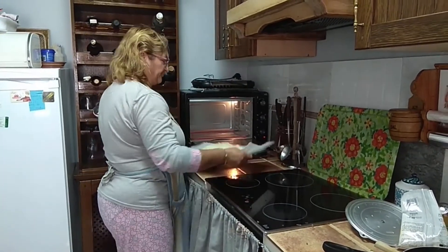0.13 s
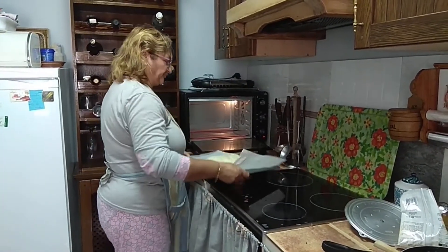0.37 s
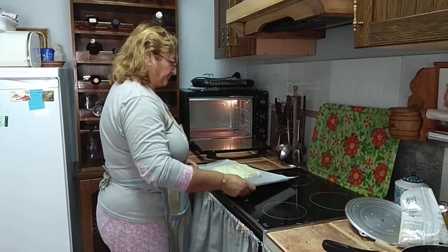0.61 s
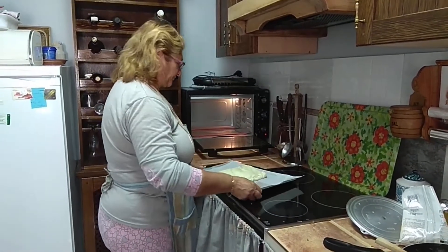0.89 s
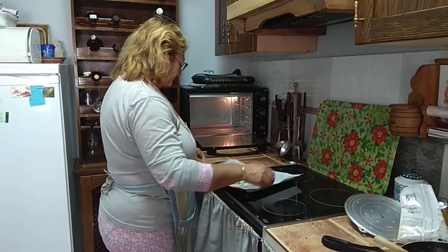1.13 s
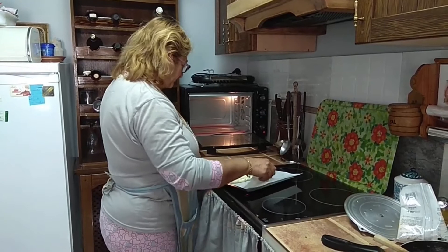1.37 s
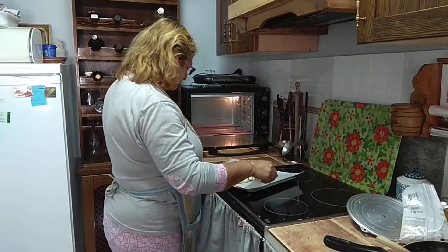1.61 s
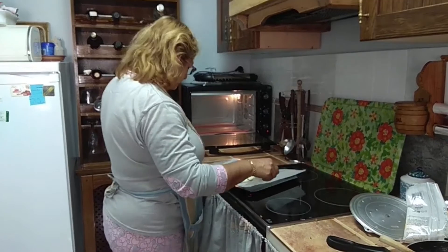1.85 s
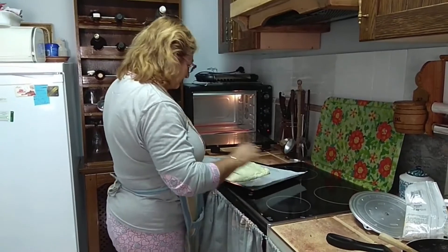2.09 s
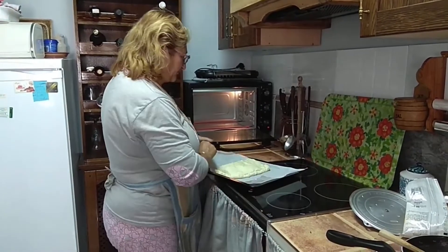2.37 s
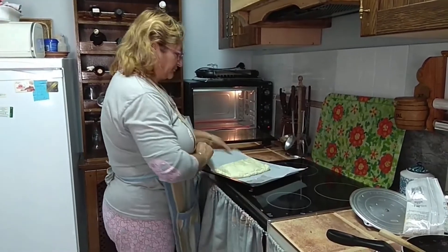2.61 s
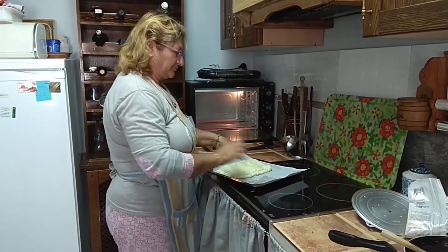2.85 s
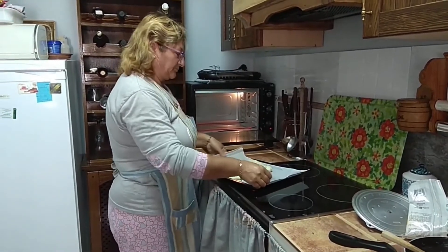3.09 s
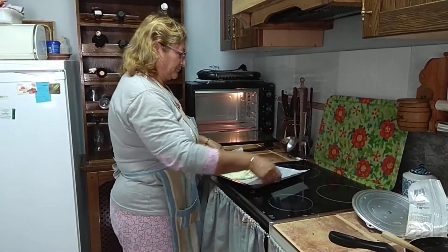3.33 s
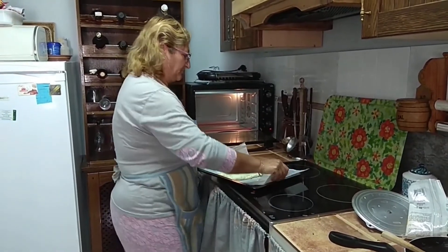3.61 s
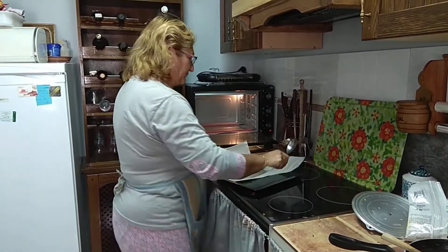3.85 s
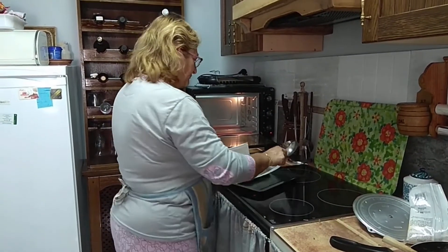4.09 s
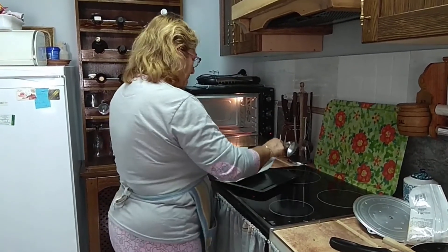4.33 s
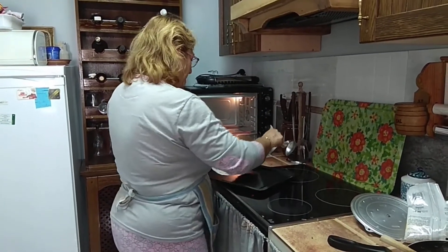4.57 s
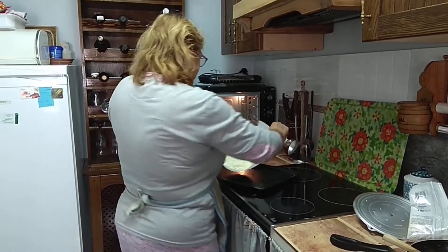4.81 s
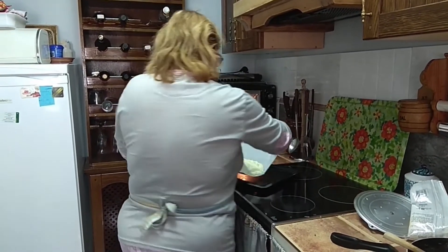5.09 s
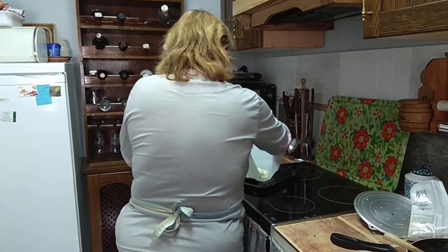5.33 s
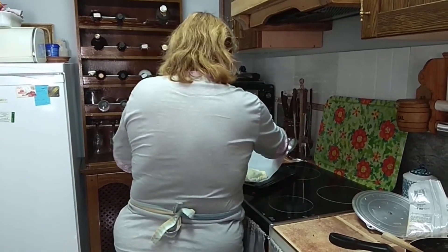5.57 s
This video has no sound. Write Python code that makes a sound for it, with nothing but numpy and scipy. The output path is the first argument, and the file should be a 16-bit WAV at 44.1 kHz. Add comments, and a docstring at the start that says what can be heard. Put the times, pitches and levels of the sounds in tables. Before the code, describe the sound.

A small, hard-walled kitchen, heard in stereo from a few metres away, with a steady faint hiss, a barely audible hum and a low rumble of movement. Paper rustles lightly at 0 to 0.4 s. At 0.54 s a thin metal baking tray lands on a glass stovetop: a hard clack, several chattering contacts within a tenth of a second, a hollow metallic ring dying within about half a second, and a smaller knock with a thud at 0.9 s. From 1.2 s baking paper crinkles in short, uneven bursts, fuller near 1.5 s, with soft bumps. A faint thin whine passes around 2.2 s. Creasing strengthens after 3 s, with sharp snaps at 3.2, 3.6 and 3.8 s and a dense crackle around 4.05 s, as rumble swells. Afterwards the paper quiets to small rustles, a crisp snap at 5.0 s, and a slight final rustle near 5.5 s.

```python
"""Paper rustles faintly over a low rumble of movement, a steady hiss and a faint hum in a small hard-walled kitchen.
After half a second a thin metal baking tray is set down on a glass stovetop: filtered clicks knock and chatter,
decaying sines ring and thud. Then hands fold baking paper: dense random clicks rustle, single impulses snap,
and a thin sine whine passes briefly. The loudest snaps come from three to four seconds in, the rumble swells again
near four and dies away. Two microphone ports stand a few metres off: cracks and paper come mostly as room echo."""
import sys
import numpy as np
from scipy import signal
from scipy.fft import rfft, irfft, next_fast_len
from scipy.io import wavfile
from scipy.ndimage import uniform_filter1d

SR = 44100
rng = np.random.default_rng(int(sys.argv[2]) if len(sys.argv) > 2 else 0)


def dump(signal):
    """Clip the signal to [-1, 1] and save it as 16-bit WAV at the path in sys.argv[1]."""
    limited = np.clip(np.atleast_2d(signal).T, -1, 1)
    pcm = np.round(limited * 32767).astype(np.int16)
    wavfile.write(sys.argv[1], SR, pcm)


def ratio_of_db(decibels):
    """Turn decibels (scalar or array-like) into linear amplitude factors; 0 dB maps to 1."""
    return 10 ** (np.asarray(decibels, float) / 20)


N = 250973
TIME = np.arange(N) / SR  # [s]

# All table levels are relative: layer gains and the port colouring follow.
# In colour tables only the shape counts, as colour() evens out the overall gain.

# Tray contacts: (time [s], blow [dB], deep ring [dB re blow], bright crack [dB re blow],
# stovetop thud [dB re blow])
TRAY_CONTACTS = [(0.542, 0.5, -19, -12.5, -36.5), (0.544, -14.5, -12.5, 3.5, -30.5),
                 (0.561, -7, -23, -3, -27), (0.579, -8.5, -25, -41, -33.5), (0.619, -20, -16, -11.5, -43),
                 (0.634, -27.5, -19, -15, -18.5), (0.783, -23, -16.5, 1.5, -7.5),
                 (0.906, -24, -11.5, 5.5, 4), (0.935, -9.5, -13, 0.5, -15.5), (0.942, -19.5, -8.5, 0, -23),
                 (1.287, -41, -13, 17.5, -33), (1.773, -26.5, -37, -4.5, -46), (4.808, -53.5, 4.5, -5, -27)]
# Colour of the dull contact crack: (frequency [Hz], level [dB per Hz])
BLOW_COLOUR = [(100, -31), (400, 2.5), (1000, 0.5), (2200, 5), (4000, -2), (6000, -7), (9000, -41),
               (14000, -59)]
# Colour of bright cracks, and of small paper creases too: (frequency [Hz], level [dB per Hz])
CRINKLE_COLOUR = [(2500, -61), (5000, -14), (7000, -16), (7800, -16.5), (8800, -10.5), (10500, -2.5),
                  (12200, -10), (13800, -20), (16000, -32)]
# Deep tray modes: (frequency [Hz], level [dB], time to fall 60 dB [s])
DEEP_MODES = [(194, -12.5, 1), (214, -14, 0.62), (230, 0.5, 0.47), (280, 7.5, 0.057), (292, -5.5, 0.41),
              (335.4, 1, 0.31), (333, -14.5, 0.95), (418.5, -4.5, 0.43), (460, -27.5, 1)]
# Upper modes of the tray's sheet, which the paper brushes too:
# (frequency [Hz], level [dB], time to fall 60 dB [s])
SHEET_MODES = [(587, -7, .4), (640, -5, .35), (792, -8, .4), (912, -7, .38), (1000, -7, .3), (1056, -9, .3),
               (1179, -10, .28), (1335, -6, .3), (1690, -5, .28), (1822, -6, .28), (1954, -9, .35),
               (2075, -1, .24), (2256, -7, .28), (2343, -4, .28), (2568, -9, .3), (2800, -11, .3)]
# Stovetop modes: (frequency [Hz], level [dB], time to fall 60 dB [s])
STOVE_MODES = [(116, -20, 0.33), (154.7, -0.5, 0.22), (178.2, -8.5, 0.057)]


def tray():
    """The contact cracks into the room while the sheet rings on and the stovetop thuds."""
    s, blow_db, deep_db, bright_db, thud_db = np.transpose(TRAY_CONTACTS)
    dull_crack = ratio_of_db(21) * colour(clicks(s, blow_db), BLOW_COLOUR)
    bright_crack = ratio_of_db(27) * colour(clicks(s, blow_db + bright_db), CRINKLE_COLOUR)
    crack = moving(dull_crack + bright_crack, direct_db=-9.5, step_s=0.025)

    tray_push = dict(scatter_db=2.5, push_s=0.002, turns=0.5)
    deep_ring = ratio_of_db(-6) * ring(s, blow_db + deep_db, DEEP_MODES, blur_hz=9, **tray_push)
    sheet_ring = ratio_of_db(-23) * ring(s, blow_db, SHEET_MODES, blur_hz=18, **tray_push)
    # keep out the low rumble that the wandering phase adds to the rings
    bass_cut = signal.butter(2, 150, "high", fs=SR, output="sos")
    rings = signal.sosfilt(bass_cut, deep_ring + sheet_ring)

    thud = ratio_of_db(5) * ring(s, blow_db + thud_db, STOVE_MODES,
                         scatter_db=2, push_s=0.015, turns=0.022, blur_hz=0.3)
    return rings + thud + crack


def ring(s, db, modes, scatter_db, push_s, turns, blur_hz):
    """Each blow sets the modes going with its own strengths; high modes reach the ports out of step."""
    out, t = np.zeros((2, N + SR)), np.arange(SR) / SR
    hz, mode_db, t60 = np.transpose(modes)[:, :, None]
    fade = 1000 ** (-t / t60) * (1 - np.exp(-t / push_s))
    # a wandering phase blurs every line: the loose sheet buzzes on the glass
    phase_steps = rng.standard_normal((len(modes), SR))
    wander = np.cumsum(phase_steps, axis=1) * np.sqrt(2 * np.pi * blur_hz / SR)
    port_sign = np.array([1, -1])[:, None, None]
    chances = rng.standard_normal((len(s), 3, len(modes), 1))
    for first, blow_db, (strength, phase, lag) in zip((s * SR).astype(int), db, chances):
        skew = np.minimum(hz / ALIKE_BELOW_HZ, 1) ** 2 * lag * port_sign
        waves = np.sin(2 * np.pi * hz * t + 2 * np.pi * turns * phase + skew + wander)
        gain = ratio_of_db(blow_db + mode_db + scatter_db * strength)
        out[:, first:first + SR] += np.sum(gain * fade * waves, axis=1)
    return out[:, :N]


# Hand moves on the paper; more coarseness means larger, duller creases:
# (start [s], swell [s], hold [s], small creases [dB], coarseness [dB])
HAND_MOVES = [(0.0, 0.021, .12, -47, -2.5), (0.211, 0.041, 0.024, -37, 2.2),
              (0.40, 0.015, 0.0068, -50.5, 2.5), (1.204, 0.031, 0.025, -45.5, -2),
              (1.273, 0.011, 0.086, -40.5, 2.5), (1.465, .015, .03, -43, -1),
              (1.52, 0.039, 0.028, -31.5, 1.2), (1.70, 0.056, 0.081, -40, 3.5),
              (1.898, 0.052, 0.09, -46.5, 6.5), (2.282, .05, 0.01, -35, 0.1), (2.47, .04, 0.051, -42, -1.5),
              (2.655, 0.011, 0.18, -45.5, -2), (2.738, 0.013, 0.01, -49.5, 1),
              (2.84, 0.12, 0.26, -42, -17.5), (3.069, 0.035, .03, -38.5, 2.5), (3.134, 0.013, 0.01, -37, 3),
              (3.192, 0.0037, 0.01, -29.5, -2.5), (3.25, 0.011, 0.013, -69, -1),
              (3.378, 0.12, 0.049, -33.5, -4), (3.55, 0.023, .02, -34.5, 6),
              (3.595, 0.011, 0.032, -24, -3.5), (3.68, 0.028, .06, -31, 0.1), (3.768, .006, 0.054, -30, -5),
              (3.898, 0.025, 0.059, -34, 3), (4.038, 0.015, 0.054, -22.5, 3.5), (4.40, .012, .03, -66, -18),
              (4.49, 0.031, 0.053, -44, 2.5), (4.579, 0.013, 0.024, -48.5, 5.5),
              (4.72, 0.027, 0.013, -40.5, -3.5), (4.875, 0.0076, 0.074, -48, 1),
              (4.994, 0.0045, 0.018, -40, -1), (5.14, 0.056, 0.044, -46, 0),
              (5.288, 0.0083, 0.1, -54.5, 8.5), (5.39, .03, 0.11, -43.5, -0.5),
              (5.538, 0.069, .07, -35.5, 0.5)]
# Creases that snap: (time [s], snap [dB], middling crease [dB re snap], large fold [dB re snap])
SNAPS = [(1.217, -29.5, -15, -28), (1.9957, -28, -35, -19), (2.33, -31.5, -10, -7),
         (3.1948, -8, -24, -13.5), (3.597, -12, -14.5, -32), (3.755, -23, -20, -8),
         (3.7707, -6.5, -20, -25), (3.8172, -10, 0.5, -34), (3.9472, -15.5, -13, -3.5),
         (4.074, -15, 5, -41), (4.4047, -32.5, -13, -21), (4.498, -33, -1, -24), (4.741, -41, -12, -19),
         (4.8792, -28, -26, -37), (4.9985, -17, -10, -22)]
# The whole sheet bends over: (start [s], hold [s], level [dB])
BENDS = [(0.205, .1, -54), (1.271, 0.064, -46.5), (1.52, 0.017, -40.5), (1.675, 0.076, -52),
         (1.86, 0.24, -56), (2.288, 0.019, -49.5), (2.468, 0.032, -55), (2.663, .03, -61),
         (3.098, 0.11, -49), (3.226, 0.015, -52), (3.43, 0.069, -52), (3.563, 0.08, -39.5),
         (3.751, 0.042, -40), (3.903, 0.084, -48.5), (4.043, 0.042, -38), (4.29, 0.065, -63),
         (4.502, 0.094, -53.5), (4.95, .04, -59), (5.265, 0.028, -53.5), (5.366, 0.014, -64.5)]
# Colour of middling creases: (frequency [Hz], level [dB per Hz])
CREASE_COLOUR = [(700, -96.5), (1500, -24), (2600, -2), (4300, -5), (5500, -3), (7000, -6), (9000, -18.5),
                 (14000, -80.5)]
# Colour of large folds: (frequency [Hz], level [dB per Hz])
FOLD_COLOUR = [(80, -62), (200, -28.5), (450, -10.5), (700, -4), (1050, -2.5), (1450, 0.5), (2000, -4),
               (2800, 6.5), (5000, -47.5), (9000, -64)]
# Level at coarseness 0: (small, middling, large creases [dB re small creases])
SIZE_DB = (0, -8.5, -23)
# Gain from coarseness: (small, middling, large creases [dB per dB])
SIZE_SLOPE = (0, 0.92, 0.79)
# How fast a move goes quiet: (small, middling, large creases [dB per s])
SETTLE_DB_PER_S = (142.5, 154, 127)


def paper():
    """Creases of three sizes crackle from bright to dull; single creases snap and set off a brief flurry."""
    start, swell_s, hold_s, small_db, coarse_db = np.transpose(HAND_MOVES)
    s, snap_db, middling_db, large_db = np.transpose(SNAPS)
    bend_s, bend_hold_s, bend_db = np.transpose(BENDS)
    swell_power, flurry_s = 1.01, 0.013
    sizes = [(snap_db, CRINKLE_COLOUR), (snap_db + middling_db, CREASE_COLOUR),
             (snap_db + large_db, FOLD_COLOUR)]
    near = 0
    for k, (peak_db, shape) in enumerate(sizes):
        move_db = small_db + SIZE_DB[k] + SIZE_SLOPE[k] * coarse_db
        snaps = clicks(s, peak_db)
        flurry = signal.lfilter([1], [1, -np.exp(-1 / (flurry_s * SR))], snaps)
        effort = moves(start, swell_s, hold_s, move_db, SETTLE_DB_PER_S[k], swell_power)
        effort = effort + ratio_of_db(-13.5) * flurry
        if k == 2:  # bends of the whole sheet make large folds only
            effort = effort + moves(bend_s, 0.018, bend_hold_s, bend_db, SETTLE_DB_PER_S[k], swell_power)
        rustle = effort * crackle(per_s=5000, spread_db=1)
        creases = colour(rustle + ratio_of_db(9.5) * snaps, shape)
        near = near + creases
    # the largest folds come last and rub on the metal
    near = near + ratio_of_db(-39) * brushed_tray(creases)
    return moving(near, direct_db=-2.5, step_s=0.15)


def crackle(per_s, spread_db):
    """Dense tiny buckling clicks of uneven size, coming in flurries of a few milliseconds."""
    flurry = uniform_filter1d(rng.standard_normal(N), size=300) * np.sqrt(300)
    hit = rng.random(N) < per_s / SR
    size_db = spread_db * np.minimum(rng.exponential(size=N), 3) + 1.3 * flurry
    return level(hit * rng.standard_normal(N) * ratio_of_db(size_db), 0)


def brushed_tray(x):
    """Paper dragged over the tray drives its sheet modes, damped resonators that hum faintly."""
    damping = 0.18  # share of the free ring time left under the paper
    out = 0
    for hz, db, t60 in SHEET_MODES:
        pole = np.exp(2j * np.pi * hz / SR - np.log(1000) / (damping * t60 * SR))
        out = out + ratio_of_db(db) * signal.lfilter([1], [1, -pole], x).imag
    return out


# Low rumble of movement: it fades, swells again with the folding near four seconds, then dies away:
# (time [s], level [dB])
RUMBLE_LEVEL = [(0.0, -47.5), (0.3, -51.5), (0.6, -51.5), (1.25, -54.5), (1.5, -64), (2.4, -59),
                (2.7, -76.5), (3.1, -80), (3.5, -66.5), (4.1, -58.5), (4.55, -62), (4.7, -84), (5.2, -92),
                (5.69, -101.5)]
# Colour of the rumble: (frequency [Hz], level [dB per Hz])
RUMBLE_COLOUR = [(60, -60.5), (120, -27), (190, -3.5), (260, -6), (350, -5), (480, -10.5), (1000, -11.5),
                 (1500, -16), (3000, -46)]
# Colour of its deepest part: (frequency [Hz], level [dB per Hz])
DEEP_COLOUR = [(20, -8), (50, -14.5), (75, -19), (105, 1.5), (125, 2), (160, -37.5), (300, -74)]
# Soft bumps of hands and body against tray and worktop:
# (start [s], bump [dB], deepest part [dB re bump])
BUMPS = [(0.36, -73, 13), (1.53, -58, -15), (1.77, -54, -16), (2.31, -72, -13), (3.24, -49.5, -21),
         (3.572, -45.5, -30), (3.77, -49.5, -21), (3.86, -61, -7), (3.98, -52.5, -39), (4.74, -66, -10),
         (5.28, -65, -9.5)]


def rumble():
    """Two bands of low noise follow the movement's level and swell with each soft bump."""
    s, bump_db, deep_db = np.transpose(BUMPS)
    movement_db = curve(RUMBLE_LEVEL)
    out = 0
    for re_db, db, shape in ((0, bump_db, RUMBLE_COLOUR), (-20, bump_db + deep_db, DEEP_COLOUR)):
        bumps = moves(s, swell_s=0.028, hold_s=0.0083, db=db, db_per_s=144, power=1)
        noise = level(colour(stereo_noise(N), shape), 0)
        out = out + (ratio_of_db(movement_db + re_db) + bumps) * noise
    return out


# A faint thin whine: (start [s], hold [s], level [dB])
WHINES = [(2.12, .03, -58), (2.195, .045, -54)]


def whine():
    """A sine near 2070 Hz with a wavering phase swells and dies away, twice in quick succession."""
    s, hold_s, db = np.transpose(WHINES)
    envelope = moves(s, 0.012, hold_s, db, db_per_s=398, power=1)
    waver = np.cumsum(uniform_filter1d(rng.standard_normal(N), size=300)) * 0.097
    return envelope * np.sin(2 * np.pi * 2070 * TIME + waver)


# Colour of the steady hiss: (frequency [Hz], level [dB per Hz])
HISS_COLOUR = [(30, -34), (150, -15), (195, -7.5), (310, -8), (420, -35.5), (800, -47.5), (988, -21),
               (1390, -24.5), (2230, -7), (4000, -26), (9970, -16), (13000, -50.5)]


def hiss():
    """Steady faint coloured noise."""
    return level(colour(stereo_noise(N), HISS_COLOUR), -61.5)


# Hum lines: (frequency [Hz], level [dB])
HUM_LINES = [(190, -81), (310, -92), (610, -87), (990, -83.5)]


def hum():
    """Steady faint sines, alike at both ports."""
    return sum(ratio_of_db(db) * np.sin(2 * np.pi * hz * TIME) for hz, db in HUM_LINES)


def background():
    """Rumble with soft bumps, a brief whine, hiss and hum together."""
    return rumble() + whine() + hiss() + hum()


# Room decay: (frequency [Hz], time to fall 60 dB [s])
ROOM_T60 = [(150, 0.41), (700, 0.4), (2000, 0.33), (5000, 0.31), (12000, 0.3)]


def room(x, direct_db):
    """Direct sound plus a diffuse tail whose treble dies first."""
    t = np.arange(SR) / SR
    noise, tail = stereo_noise(SR), 0
    hz, t60 = np.transpose(ROOM_T60)
    for centre in 60 * 2. ** np.arange(9):  # octave bands [Hz]
        edges = [centre / np.sqrt(2), min(centre * np.sqrt(2), SR * 0.49)]
        band = signal.butter(2, edges, "band", fs=SR, output="sos")
        band_t60 = np.interp(np.log(centre), np.log(hz), t60)
        tail = tail + signal.sosfilt(band, noise) * 1000 ** (-t / band_t60)
    # reflections need a moment to build up
    tail = level(tail * (1 - np.exp(-t / 0.00068)), 0) / np.sqrt(SR)
    # the direct sound comes bundled with echoes off the worktop and cupboards close by
    first = level(stereo_noise(SR) * np.exp(-t / 0.0012), direct_db) / np.sqrt(SR)
    return signal.fftconvolve(x[None], first + tail, axes=1)[:, :N]


def moving(x, direct_db, step_s):
    """A source that shifts about: it fades through four sets of echo paths in turn, over and over."""
    place = TIME / step_s
    shares = [np.sqrt(np.maximum(1 - np.abs((place - k) % 4 - 1), 0)) for k in range(4)]
    return sum(room(x * share, direct_db) for share in shares)


ALIKE_BELOW_HZ = 710  # longer waves reach both ports alike


def apart(x):
    """The part of a sound that differs between the ports: little bass, all of the treble."""
    treble = signal.butter(2, ALIKE_BELOW_HZ, "high", fs=SR, output="sos")
    return 0.027 * x + signal.sosfilt(treble, x)


def stereo_noise(size):
    """Noise that is shared by the ports in the bass and unrelated in the treble."""
    mid, side = rng.standard_normal((2, size))
    return (mid + np.outer([1, -1], apart(side))) / np.sqrt(2)


def clicks(s, db):
    """One sharp impulse at each time."""
    out = np.zeros(N)
    out[(s * SR).astype(int)] = ratio_of_db(db)
    return out


def moves(s, swell_s, hold_s, db, db_per_s, power):
    """Envelopes that swell, hold and die away, summed."""
    out = np.zeros(N)
    for at, swell, hold, peak_db in np.broadcast(s, swell_s, hold_s, db):
        first = int(at * SR)
        t = TIME[first:first + SR] - at
        fall_db = db_per_s * np.maximum(t - swell - hold, 0)
        out[first:first + SR] += np.clip(t / swell, 0, 1) ** power * ratio_of_db(peak_db - fall_db)
    return out


def level(x, db):
    """Scale to an rms level."""
    return x * ratio_of_db(db) / np.sqrt(np.mean(x ** 2))


def colour(x, points):
    """Filter by (frequency [Hz], level [dB]) points; white noise keeps its level."""
    hz, db = np.transpose(points)
    size = next_fast_len(N)
    bins = np.log(np.fft.rfftfreq(size, 1 / SR) + 1)
    gain = ratio_of_db(np.interp(bins, np.log(hz + 1), db, left=db[0], right=db[-1]))
    gain = gain / np.sqrt(np.mean(gain ** 2))
    return irfft(rfft(x, size) * gain, size)[..., :N]


def curve(table):
    """A (time [s], value) table, per sample."""
    return np.interp(TIME, *np.transpose(table))


def scene():
    """Tray, paper and background together."""
    return tray() + paper() + background()


def top_cut(x):
    """Nothing passes above the cut-off."""
    return signal.sosfilt(signal.butter(12, 16830, fs=SR, output="sos"), x)


# Colour difference of the ports: (frequency [Hz], left minus right [dB])
PORT_BALANCE = [(60, -6), (110, 14.5), (200, 6), (380, 11), (700, 8.5), (1290, 8), (2380, 15), (4400, 4.5),
                (8120, 7.5), (15000, 11.5)]


def record(dry):
    """The two ports differ in colour and slightly in gain, and the loudest peaks are rounded."""
    hz, db = np.transpose(PORT_BALANCE)
    ports = [colour(x, np.transpose([hz, side * db / 2])) for x, side in zip(dry, (1, -1))]
    mix = np.tanh(np.array(ports) * ratio_of_db([[-0.3], [0.3]]))
    return top_cut(mix)


dry = scene()
out = record(dry)
dump(out)
```